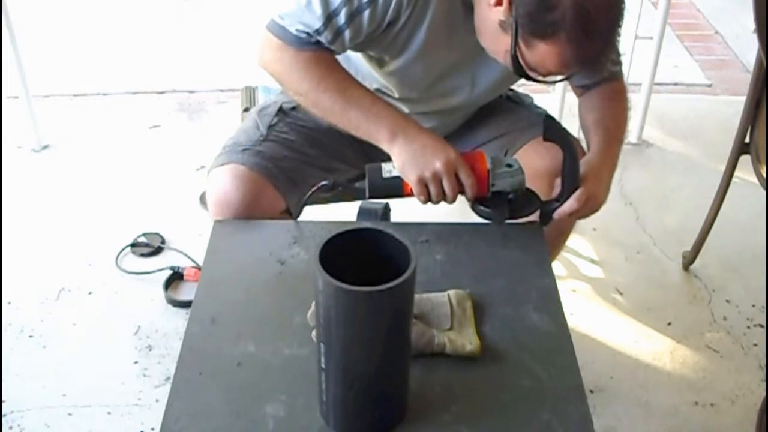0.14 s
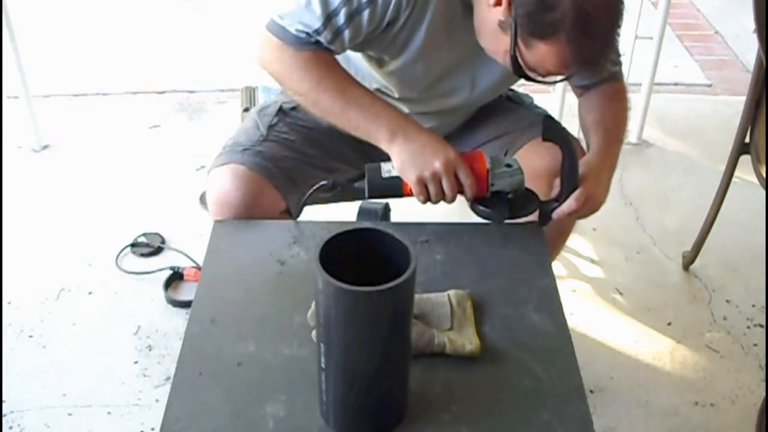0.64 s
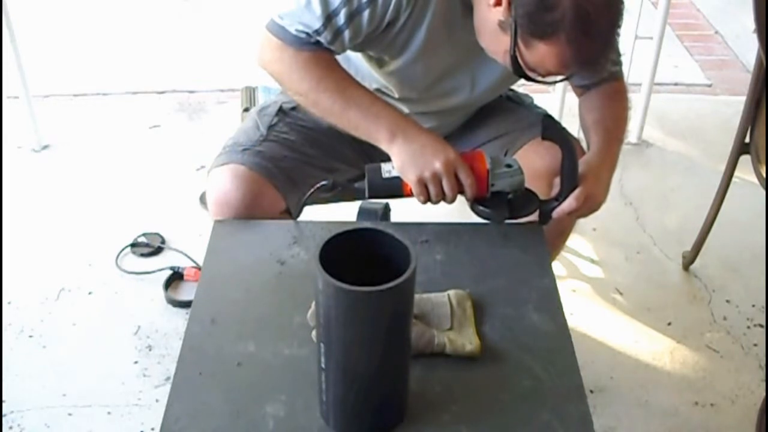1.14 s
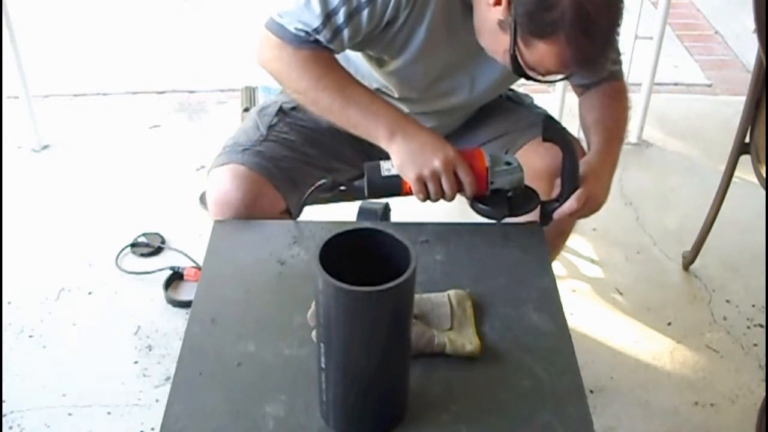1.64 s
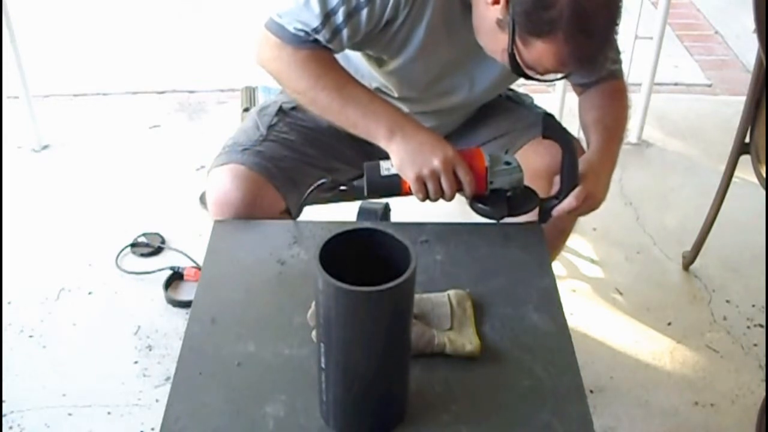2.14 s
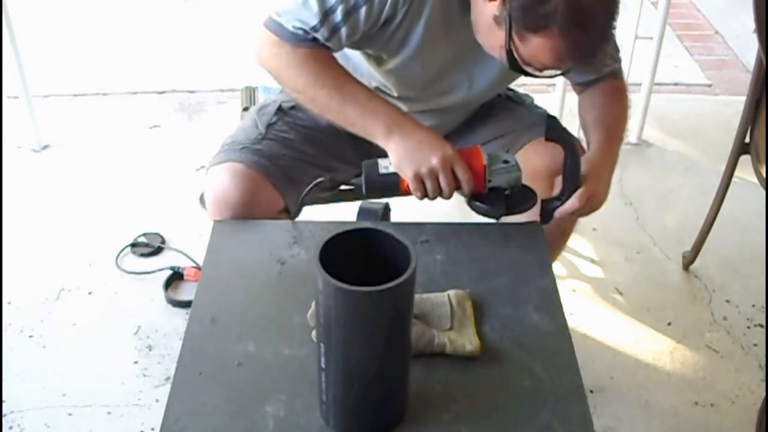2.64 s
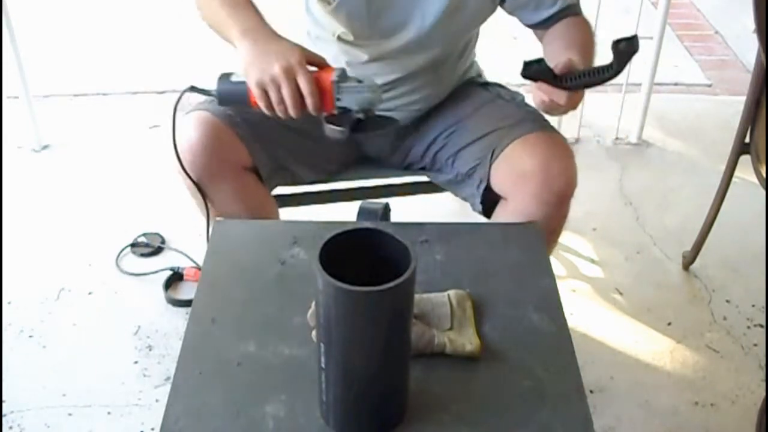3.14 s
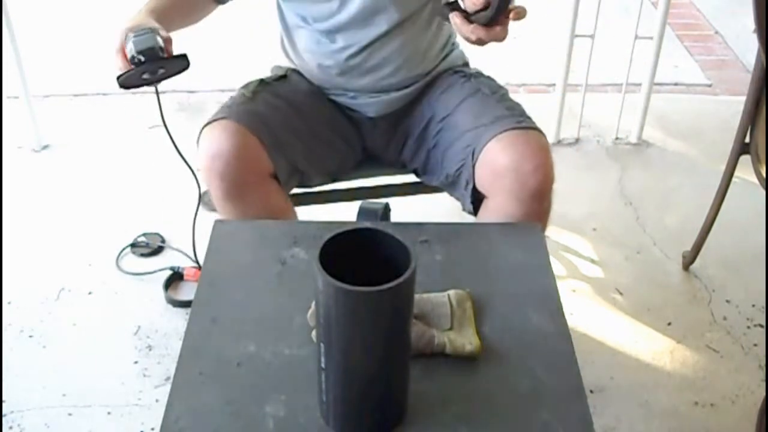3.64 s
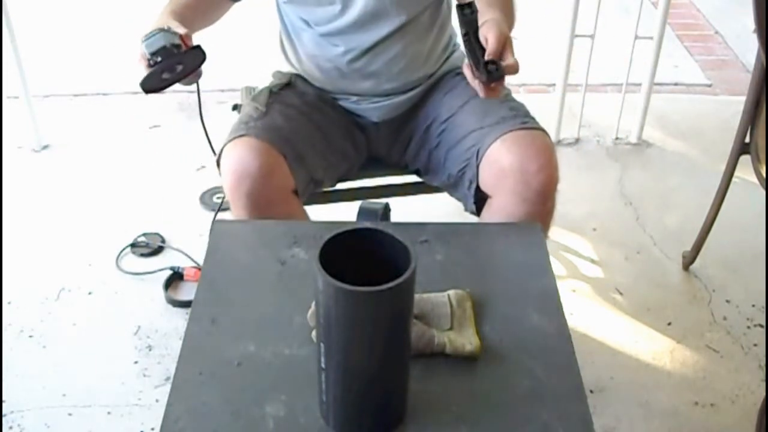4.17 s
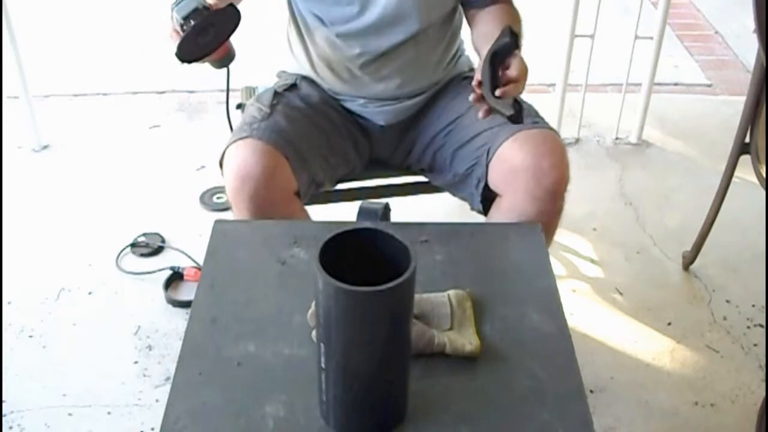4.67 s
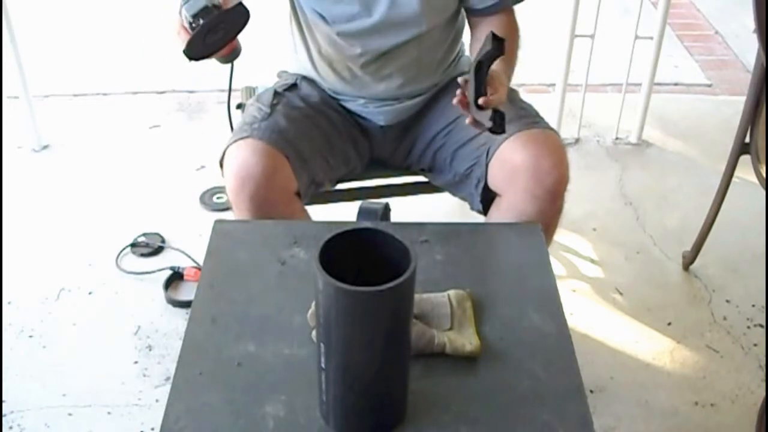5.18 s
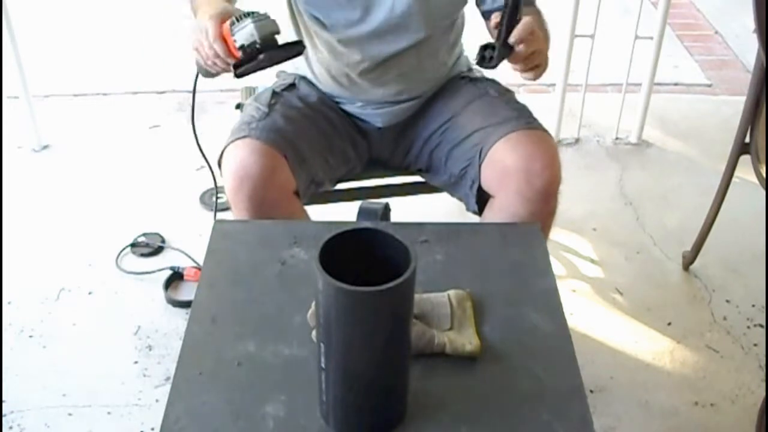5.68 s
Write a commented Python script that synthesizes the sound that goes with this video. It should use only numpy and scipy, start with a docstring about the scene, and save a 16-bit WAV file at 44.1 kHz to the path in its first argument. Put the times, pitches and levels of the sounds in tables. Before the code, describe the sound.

From 0 s an angle grinder is already running at full speed, close to the microphone on an open porch, with no obvious echo. Its sound is a rattling mid-high gear roar, a cluster of piercing, wavering metallic whines, airy fan hiss and a weaker steady hum. Over it the overloaded microphone crackles densely, with sharp irregular clicks, pops and rasp; it thins briefly around 0.7 and 1.2 s. The disc lifts off the plastic at about 2.6 s and rings more freely. Around 3.05 s the pops crowd into a loud burst, and at about 3.1 s the power goes off. Crackle dies out by 3.4 s, leaving a cleaner, uneven whirring. The hum slides down and disappears before 5 s, while disc tones flare between 3.5 and 4.3 s. Gear noise and hiss fade gradually, still audible at the end near 5.8 s, above a very faint low rumble.

```python
"""Angle grinder coasting down

A grinder runs on a porch, lifts its disc off some plastic, is switched off and coasts down.
Shaped noise makes the gears, the fan air and a low whir; narrow noise and wandering tones ring the
disc and gear case; a sine at the rotor's speed hums. Early on, an overloaded input crackles and pops:
sudden jumps that slide back, at listed and random moments, with raspy noise around them.
Sparse low blips and a continuous deepest bass are faintly heard below it all."""
import sys
import numpy as np
from scipy import signal
from scipy.fft import rfft, irfft, next_fast_len
from scipy.io import wavfile
from scipy.ndimage import uniform_filter1d, map_coordinates

SR = 44100
rng = np.random.default_rng(int(sys.argv[2]) if len(sys.argv) > 2 else 0)


def magnitude_from_level(level_db):
    """Linear magnitude for a level in decibels (20 dB per decade)."""
    exponent = np.asarray(level_db, float) / 20
    return 10 ** exponent


def int16_out(signal):
    """Quantize to a 16-bit WAV file."""
    q = np.round(np.clip(np.atleast_2d(signal).T, -1, 1) * 32767)
    wavfile.write(sys.argv[1], SR, q.astype(np.int16))


N = 255766  # samples, about 5.8 s

# faint low blips and deepest bass: (frequency [Hz], level of each small piece [dB])
LOW_BLIP_LEVELS = [(20, -72), (110, -70.5), (150, -60), (250, -58.5), (400, -68.5), (700, -58.5),
                   (950, -62.5), (1050, -90), (2000, -180)]
# how much weaker the side (left minus right) noise starts out: (frequency [Hz], level [dB])
SIDE_SHARE = [(60, -14), (180, -6), (540, -6.5), (1630, -14), (4910, -18), (14800, -10)]

# overload pops at listed moments, many big or long, a few small, before the input rounds them:
# (time [s], signed size, decay [ms])
LISTED_POPS = [(0.0177, -0.16, 0.77), (0.0747, -0.27, 0.13), (0.107, 0.13, 0.34), (0.1343, 0.42, 0.25),
               (0.1358, -0.51, 0.24), (0.1464, -0.098, 0.33), (0.1637, 0.18, 1.1), (0.196, 0.6, 0.18),
               (0.2443, 0.23, 0.2), (0.3143, -0.2, 2.2), (0.3814, 0.097, 4.5), (0.3987, -0.69, 0.15),
               (0.4472, 0.55, 0.18), (0.5094, -0.21, 2), (0.5261, -0.48, 0.23), (0.5284, 0.52, 0.27),
               (0.5624, 0.32, 1), (0.5975, 0.18, 0.55), (0.6464, -0.54, 0.46), (0.6486, 0.32, 0.45),
               (0.6874, -0.3, 0.69), (0.6889, 0.23, 0.74), (0.7894, -0.35, 0.1), (0.8626, -0.58, 0.096),
               (0.9492, -0.4, 0.46), (0.9725, 0.21, 0.24), (0.9914, 0.25, 0.83), (1.0169, -0.27, 0.19),
               (1.0196, -0.1, 1.2), (1.0806, 0.2, 1.1), (1.0972, 0.18, 0.43), (1.1248, -0.25, 1.3),
               (1.1742, -0.12, 0.22), (1.1828, 0.23, 0.48), (1.2732, -0.64, 0.088), (1.3141, -0.55, 0.21),
               (1.3376, 0.56, 0.23), (1.3471, -0.1, 4.6), (1.4482, 0.52, 0.1), (1.4918, -0.51, 0.13),
               (1.5608, -0.46, 0.2), (1.579, -0.35, 0.26), (1.6229, -0.35, 0.18), (1.6965, -0.16, 0.78),
               (1.7117, 0.22, 0.47), (1.713, -0.53, 0.19), (1.7536, 0.19, 0.54), (1.8188, 0.21, 0.32),
               (1.8347, 0.12, 3.4), (1.8701, 0.2, 0.59), (1.9231, -0.17, 1.4), (1.9668, -0.18, 1.4),
               (2.0322, 1, 0.12), (2.0574, -0.24, 0.42), (2.1151, 0.24, 1.08), (2.1478, 0.15, 0.88),
               (2.1758, 0.2, 0.55), (2.212, -0.16, 0.94), (2.237, -0.24, 1.4), (2.2468, 0.53, 0.11),
               (2.3268, 0.37, 0.5), (2.328, -0.41, 0.51), (2.3697, -0.031, 0.38), (2.4579, -0.58, 0.14),
               (2.5667, 0.37, 1), (2.6168, -0.8, 0.086), (2.6482, -0.18, 1.4), (2.7079, 0.16, 0.41),
               (2.725, -0.2, 1.62), (2.7473, 0.53, 0.47), (2.7651, 0.22, 2.5), (2.8139, 0.83, 0.17),
               (2.8349, -0.69, 0.24), (2.852, -0.84, 0.18), (2.8746, 0.29, 0.41), (2.9437, 0.34, 0.12),
               (2.9739, -0.29, 0.15), (3.0, -0.047, 0.15), (3.0218, -0.27, 0.59), (3.0459, 0.61, 0.15),
               (3.0563, -0.65, 0.13), (3.057, 0.056, 3.3), (3.0644, 0.76, 0.19), (3.0648, -0.86, 0.14),
               (3.0681, -0.97, 0.12), (3.0856, 0.16, 0.91), (3.0946, 0.66, 0.25), (3.1429, 0.18, 0.15),
               (3.1601, -0.18, 0.12), (3.1738, -0.077, 3.7), (3.2278, -0.47, 0.14), (3.275, -0.25, 0.17),
               (3.3305, 0.15, 0.93), (3.3685, -0.34, 0.2)]
# spells of thinner or thicker crackle: (time [s], length [s], share of the usual rate)
CRACKLE_SPELLS = [(0.701, .16, .02), (0.86, .085, 0.41), (0.944, 0.26, 0.76), (1.19, 0.082, 0.019),
                  (2.456, 0.084, .15), (2.88, .16, .35), (3.042, 0.088, 2.02)]
# colour of the raspy noise around the pops: (frequency [Hz], level per Hz [dB])
RASP_COLOUR = [(60, -120), (120, -7), (500, -8), (1000, -7.5), (2000, -13), (4000, -120)]
CRACKLE_PER_S, CRACKLE_END_S = 125, 3.18  # usual rate of the random pops, and when they stop
RASP_UNDER_LOAD_DB = -33  # weak base of raspy noise under load, stronger in thick spells

# level of the rotor hum before it wavers: (time [s], level [dB])
HUM_LEVEL = [(0, -48), (.6, -43), (1.65, -43.5), (1.9, -52.5), (3.1, -48.5), (3.5, -55), (4.05, -59),
             (4.4, -68), (4.8, -65), (4.9, -100), (5.8, -100)]
# short moments when the weak hum is hardly heard: (time [s], length [s])
HUM_UNHEARD = [(4.06, .045), (4.42, .15)]
# full speed [turns/s], when the power goes off [s], time for the speed to fall by a factor e [s]
FULL_TURNS, POWER_OFF_S, COAST_S = 408, 3.13, 2.86

# base levels as the grinder is moved and slows: (time [s], gear noise [dB], fan air [dB])
RUN_LEVELS = [(0.0, -23.5, -31), (0.08, -22, -29), (0.56, -23, -29), (0.87, -23, -31.5), (0.97, -23, -30),
              (3.04, -23, -29), (3.07, -20, -26.5), (3.13, -23, -30.5), (3.29, -22.5, -29.5),
              (3.44, -26.5, -31.5), (3.92, -28, -36.5), (4.22, -29.5, -36.5), (4.3, -29, -38),
              (5.56, -32, -42.5), (5.8, -33.5, -45.5)]
# colour of the low whir: (frequency [Hz], level per Hz [dB])
WHIR_COLOUR = [(600, -120), (780, -25), (900, -14), (1100, -2), (1500, -5), (1950, -1), (2300, -4.5),
               (2600, 0.5), (3400, -49), (5700, -120)]
# colour of the fan air: (frequency [Hz], level per Hz [dB])
AIR_COLOUR = [(1500, -120), (3820, -25), (6500, -3.5), (7600, -3.5), (9470, -1.5), (10200, -2.5),
              (12600, -3), (14100, -4.5), (14600, -22)]
# colour of the broad gear noise: (frequency [Hz], level per Hz [dB])
GEAR_COLOUR = [(900, -120), (1400, -41), (2000, -15), (2770, -5), (3070, -1), (3310, -1.5), (4330, 0),
               (5460, -0.5), (6270, -5.5), (8000, -6), (10400, -47), (17600, -120)]

# weaker ringing modes of disc and gear case: (frequency [Hz], width [Hz], relative level [dB])
WEAK_MODES = [(2720, 60, -5.5), (3186, 135, -9.5), (4985, 46, -0.5), (5846, 66, -2.5), (6264, 40, -4),
              (6660, 160, -16.5), (7310, 106, -11.5), (7540, 41, -3.5), (7540, 25, -33), (10230, 260, -13)]
# change of the weaker modes once the disc is free: (frequency [Hz], change [dB])
FREE_CHANGE = [(2670, -17), (3200, 1), (5800, -9), (6305, -20), (6630, -7), (7195, -5.5), (8235, -11),
               (10300, -11)]
# strongest disc modes, levels against the base gear level:
# (frequency [Hz], width [Hz], level under load [dB], level when free [dB], change in coasting [dB/s])
STRONG_MODES = [(2170, 45, -30, -29.5, 3.1), (2960, 39.75, -16.5, -16.5, 3), (3620, 140, -18.5, -15.5, 1.9),
                (4235, 52, -10.5, -13, -0.5), (4688, 55, -10.5, -13, -0.1), (5298, 55, -18, -14.5, 1.5)]
# moments when the nearest strong mode flares up or, if negative, dips:
# (time [s], frequency [Hz], rise [dB])
MODE_FLARES = [(0.16, 4235, 3), (0.16, 2960, 3), (0.4, 5280, 10), (0.4, 2960, 6), (0.4, 4688, 1),
               (0.55, 4235, 6), (1.0, 5280, 8), (1.0, 3620, 8), (1.08, 4235, 2), (1.71, 5280, 11),
               (1.71, 4688, 7), (1.94, 5280, 9), (1.94, 4235, 7), (1.94, 3620, 9), (2.55, 2960, 10),
               (2.55, 4688, 4), (2.84, 4688, 7), (2.89, 4235, 6), (3.07, 4235, 8.5), (3.17, 5280, 10),
               (3.27, 3620, 6), (3.3, 4235, 5), (3.52, 5280, 12.5), (3.619, 2960, 13), (3.73, 2170, 17),
               (3.73, 4688, 9.5), (3.92, 5280, 8), (3.96, 4235, 12), (4.2, 2170, 10), (4.2, 4235, 6),
               (4.28, 4688, 7), (4.31, 2960, -4), (4.64, 5280, 6), (4.64, 4235, 5), (4.99, 4688, 4)]
FLARE_S = 0.032  # time from the top of a flare until its dB rise has shrunk by a factor e
LIFT_OFF_S, SETTLE_S = 2.62, 0.42  # the disc leaves the plastic; time until it rings freely
WAVER_DB, WAVER_PER_S = 2.5, 28  # each strong mode swells and sinks by itself


def unit(x):
    """Scale a signal to an average (rms) size of 1."""
    return x / np.sqrt(np.mean(x ** 2) + 1e-20)


def along(points, hz):
    """Read a curve of (frequency [Hz], value) points, with pitch-like (log) spacing."""
    f, v = np.transpose(points)
    return np.interp(np.log(hz + 1), np.log(f + 1), v)


def curves(rows):
    """Give one value per sample for each column after the time."""
    s, *cols = np.transpose(rows)
    return [np.interp(np.arange(N) / SR, s, c) for c in cols]


def wobble(rate):
    """A smooth random curve through `rate` random points a second."""
    points = rng.standard_normal(int(N * 100 / SR) + 4)
    return map_coordinates(points, [np.arange(N) * rate / SR])


def filtered(x, response):
    """Make each frequency stronger or weaker, as the response says."""
    m = next_fast_len(N + 8192)
    return irfft(rfft(x, m) * response(np.fft.rfftfreq(m, 1 / SR)), m)[..., :N]


def noise(response):
    """Mid and side noise of one colour, the side weaker."""
    def pair_response(hz):
        return response(hz) * np.array([np.ones_like(hz), magnitude_from_level(along(SIDE_SHARE, hz))])
    pair = filtered(rng.standard_normal((2, N)), pair_response)
    return pair / np.std(pair[0])


def hiss(colour):
    """Noise with a broad mix of frequencies."""
    return noise(lambda hz: magnitude_from_level(along(colour, hz)))


def patchy(pair, depth_db):
    """Noise heard in small patches of time and frequency, each of random loudness."""
    z = signal.stft(pair, nperseg=1024)[2]
    field = rng.standard_normal(z.shape[1:])
    field = uniform_filter1d(uniform_filter1d(field, size=4, axis=0), size=4, axis=1)
    pair = signal.istft(z * magnitude_from_level(depth_db * unit(field)), nperseg=1024)[1][:, :N]
    return pair / np.std(pair[0])


def low_blips():
    """Sparse, narrow low blips of like size are heard over a continuous deepest bass."""
    hz, _, z = signal.stft(rng.standard_normal((2, N)), SR, nperseg=2048)
    kept = rng.random(z.shape) < .035
    blips = kept * z / np.abs(z)
    cells = np.where((hz < 120)[:, None], z / np.std(z), blips)
    levels = magnitude_from_level(along(LOW_BLIP_LEVELS, hz))[:, None]
    pair = signal.istft(cells * levels, nperseg=2048)[1][:, :N]
    return pair * magnitude_from_level([[0], [-8]])


def random_pops(expected, clock):
    """Random pops; `expected` counts how many should have come by each moment."""
    draw = rng.random(size=(800, 4))
    arrivals = np.cumsum(.3 - .7 * np.log(draw[:, 0] + 1e-9))  # uneven steps, 1 on average
    s = np.interp(arrivals, expected, clock)
    size = np.sign(draw[:, 1] - .5) * (.07 + .3 * draw[:, 2] ** 2.1)
    decay_ms = .14 / (1 - .7 * draw[:, 3] ** 5)
    return np.c_[s, size, decay_ms][arrivals < expected[-1]]


def rasp(jumps, share, clock):
    """Raspy noise around the pops, plus a weak base under load, stronger in thick spells."""
    nearby = np.sqrt(np.abs(uniform_filter1d(jumps ** 2, size=1000)))
    thickness = uniform_filter1d(np.sqrt(share), size=1000)
    fade = np.clip((3.36 - clock) / .04, 0, 1)
    activity = nearby + magnitude_from_level(RASP_UNDER_LOAD_DB) * thickness * fade
    return magnitude_from_level(-14.0) * activity * hiss(RASP_COLOUR)


def pops():
    """Each overload jumps off centre at once and slides back, at listed and random moments."""
    clock = np.arange(N) / SR
    share = np.ones(N)
    for s, length, k in CRACKLE_SPELLS:
        share *= np.where((clock > s) & (clock < s + length), k, 1)
    expected = np.cumsum(CRACKLE_PER_S * share * (clock < CRACKLE_END_S)) / SR
    s, size, decay_ms = np.r_[LISTED_POPS, random_pops(expected, clock)].T
    t = np.arange(1200) / SR
    shapes = size[:, None] * np.exp(-1000 * t / decay_ms[:, None])
    at = (s * SR).astype(int)[:, None] + np.arange(len(t))
    jumps = np.bincount(at.ravel(), shapes.ravel(), N + len(t))[:N]
    # the input stage overshoots a little after each jump
    edge_hz = 2600
    jumps = filtered(jumps, lambda hz: 1 / (1 - (hz / edge_hz) ** 2 + 1j * hz / edge_hz / 2.0))
    # the two channels do not jump by quite the same amount
    pair = jumps * np.array([np.ones(N), 0.13 * wobble(99)])
    return pair + rasp(jumps, share, clock)


def rotor_hum():
    """A wavering sine once per turn; after power-off its pitch falls and grows less steady."""
    clock = np.arange(N) / SR
    unheard = sum((clock > s) & (clock < s + length) for s, length in HUM_UNHEARD)
    hum_db = curves(HUM_LEVEL)[0] - uniform_filter1d(40. * unheard, size=600)
    slowing = np.maximum(clock - POWER_OFF_S, 0) / COAST_S
    turns = FULL_TURNS * np.exp(-slowing)
    wander = (1.32 + 9 * slowing) * wobble(25.03)
    tone = np.sin(2 * np.pi * np.cumsum(turns + wander) / SR)
    return np.sqrt(2) * magnitude_from_level(hum_db + 2.8 * wobble(24.8)) * tone * [[1], [.05]]


def low_whir(gear_db, rattle):
    """Low noise that follows the level of the gears; it is heard in patches."""
    return magnitude_from_level(gear_db - 15.5 + rattle) * patchy(hiss(WHIR_COLOUR), depth_db=2)


def fan_air(air_db, rattle):
    """High hiss of the fan, shaken a little by the rattle; it is heard in patches."""
    level = magnitude_from_level(air_db + 0.34 * rattle + 0.61 * wobble(50))
    return level * patchy(hiss(AIR_COLOUR), depth_db=1.5)


def free():
    """0 while the disc is on the plastic, rising to 1 once it rings freely."""
    return np.clip((np.arange(N) / SR - LIFT_OFF_S) / SETTLE_S, 0, 1)


def ring(fc_hz, width):
    """Noise gathered around the frequency of one mode."""
    return noise(lambda hz: 1 / (1 + (2 * (hz - fc_hz) / width) ** 2))


def disc():
    """Tooth chatter rings each weaker mode on its own; the balance shifts without load."""
    coasting = free()
    rings = np.zeros((2, N))
    for hz, width, db in WEAK_MODES:
        level_db = db + coasting * along(FREE_CHANGE, hz) + 0.63 * wobble(4.7)
        rings += ring(hz, width) * np.sqrt(width) * magnitude_from_level(level_db)
    return rings / np.std(rings[0])


def gears(gear_db, rattle):
    """Rattling broad gear noise together with the weaker ringing modes."""
    level = magnitude_from_level(gear_db + 0.81 * rattle + 0.73 * wobble(85))
    return level * (magnitude_from_level(-10.0) * disc() + magnitude_from_level(-2.5) * hiss(GEAR_COLOUR))


def whine(fc_hz, width):
    """A strongly driven mode: a tone even in size, wandering in pitch, with some noise."""
    pitch = fc_hz + .7 * width * wobble(35)
    tone = np.sqrt(2) * np.sin(2 * np.pi * np.cumsum(pitch) / SR)
    return 0.77 * tone * [[1], [0]] + 0.61 * ring(fc_hz, width) * [[1], [1.6]]


def singing(gear_db):
    """The strong modes follow the gears, waver and now and then flare."""
    t, centres = np.arange(N) / SR, np.transpose(STRONG_MODES)[0]
    rise_db = np.zeros((len(centres), N))
    for s, hz, db in MODE_FLARES:
        nearest = np.argmin(np.abs(centres - hz))
        rise_db[nearest] += db * np.exp(-((t - s) / FLARE_S) ** 2)
    freedom, coasting_s = free(), np.maximum(t - POWER_OFF_S, 0)
    total = np.zeros((2, N))
    for (hz, width, load_db, free_db, drift_db), rise in zip(STRONG_MODES, rise_db):
        mode_db = load_db + freedom * (free_db - load_db) + drift_db * coasting_s
        waver = WAVER_DB * wobble(WAVER_PER_S)
        total += magnitude_from_level(gear_db + mode_db + rise + waver) * whine(hz, width)
    return total


def grinder():
    """The whole machine; one shared rattle moves the whir, air and gears together."""
    gear_db, air_db = curves(RUN_LEVELS)
    rattle = wobble(30)
    moving_parts = low_whir(gear_db, rattle) + fan_air(air_db, rattle) + gears(gear_db, rattle)
    return rotor_hum() + moving_parts + singing(gear_db)


def scene():
    """All sounds, left a little weaker; the side signal flickers, most in the treble."""
    mid, side = low_blips() + pops() + grinder()
    treble = filtered(side, lambda hz: 1 / (1 + (5600 / (hz + 1)) ** 8))
    treble_flicker = magnitude_from_level(np.minimum(5 * wobble(22.17), 2))
    side = (side - treble) * magnitude_from_level(0.28 * wobble(10)) + treble * treble_flicker
    # the deepest bass has little width
    side = filtered(side, lambda hz: 1 / (1 + (60 / (hz + 1)) ** 4))
    return np.array([mid + side, mid - side]) * magnitude_from_level([[-.22], [.22]])


def roll_off(x):
    """The treble ends steeply here."""
    return signal.sosfilt(signal.butter(12, 15360, fs=SR, output="sos"), x)


def record(dry):
    """The input flattens its highest peaks and cuts everything above its band limit."""
    top = .29  # the size that flattened peaks cannot pass
    flat = dry / (1 + np.abs(dry / top) ** 5) ** (1 / 5)
    mix = filtered(flat, lambda hz: hz < 14550)
    return roll_off(mix)


dry = scene()
out = record(dry)
int16_out(out)
```